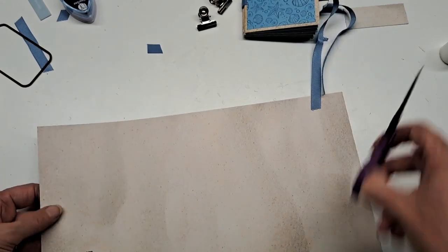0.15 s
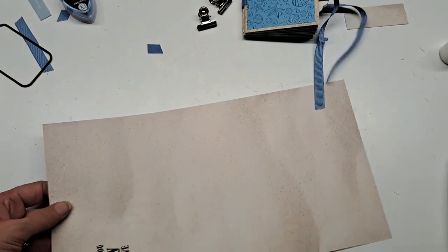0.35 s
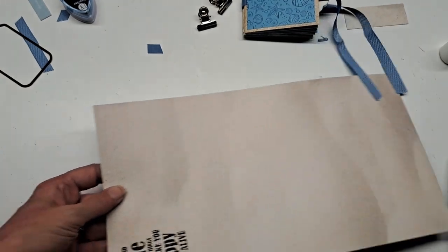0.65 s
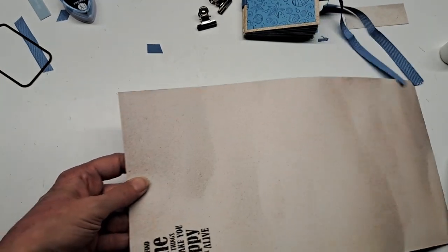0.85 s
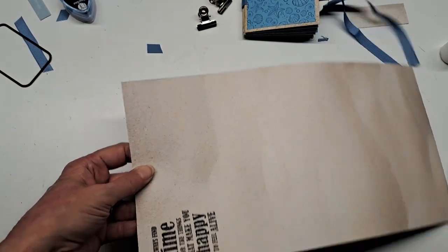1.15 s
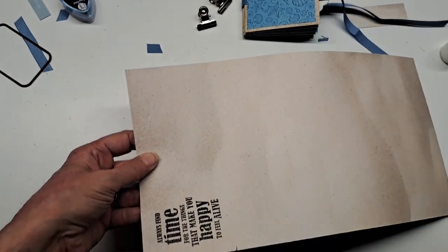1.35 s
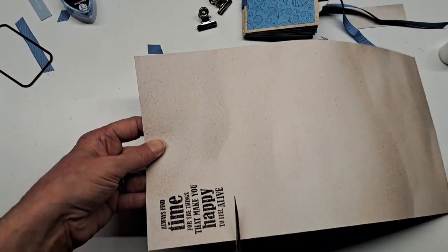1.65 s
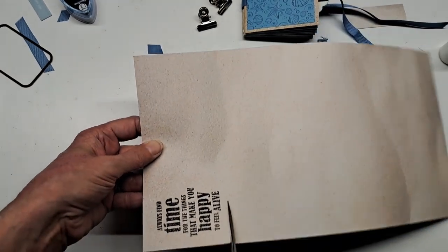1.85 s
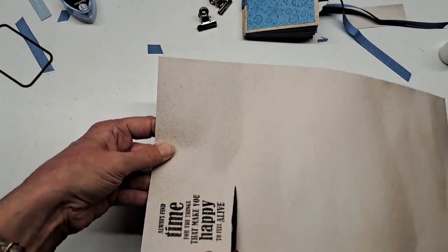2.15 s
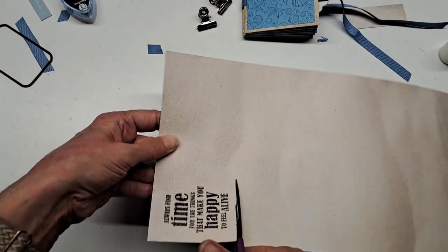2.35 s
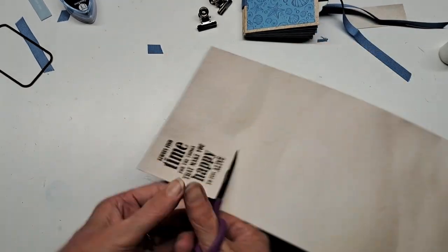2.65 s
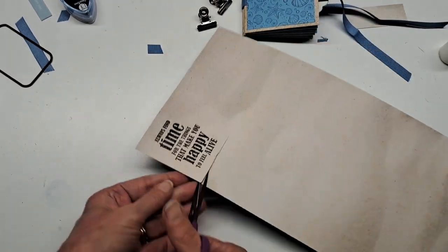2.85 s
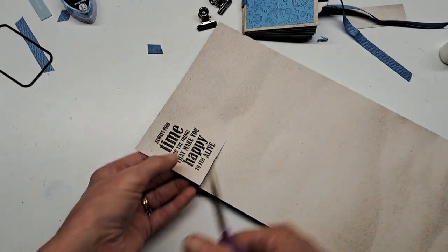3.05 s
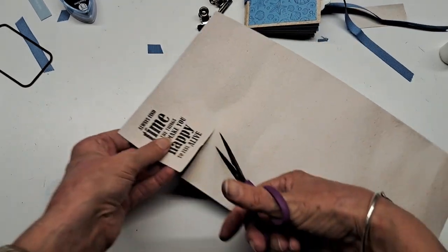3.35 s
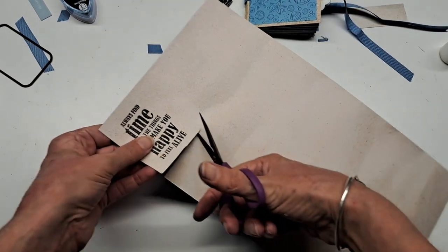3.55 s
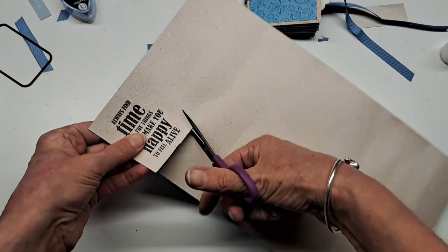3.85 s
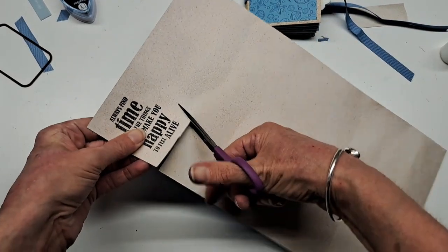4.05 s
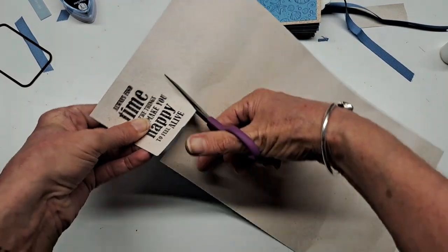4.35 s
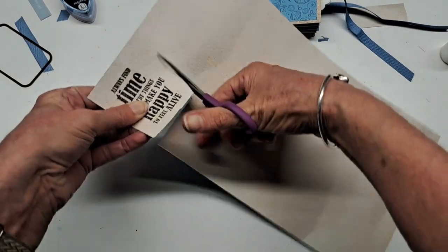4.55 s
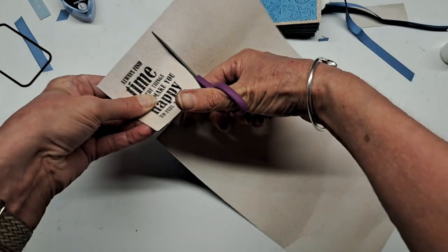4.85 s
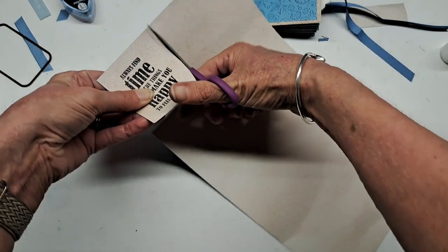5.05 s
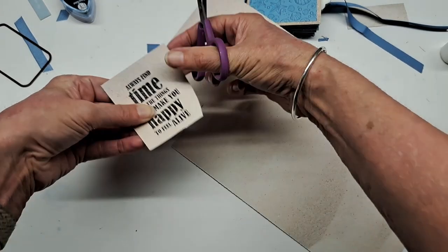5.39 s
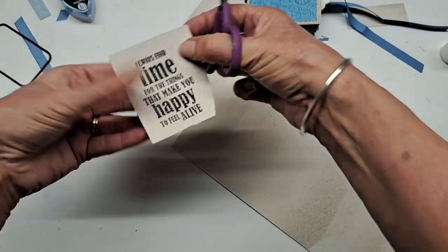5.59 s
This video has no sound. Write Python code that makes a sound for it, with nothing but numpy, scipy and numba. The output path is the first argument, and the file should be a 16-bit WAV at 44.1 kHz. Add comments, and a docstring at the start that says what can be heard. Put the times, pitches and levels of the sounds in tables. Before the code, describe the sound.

A close, dry stereo perspective in a small quiet room with faint air noise. At 0 s scissors scrape very briefly off the table; around 0.3-0.6 s a hand brushes softly along stiff card, its airy note falling. Faint nibbles and ticks at the edge come at 0.9-1.4 s. From about 1.7 s the cut builds, strongest from 2.0 to 2.45 s: coarse, uneven crunches with sharp fibre snaps and blade hiss. At 2.5-2.8 s the sheet is turned, with a cluster of dull bumps on the table and flexing, rubbing card. Quiet sliding and small ticks follow until 3.9 s, when soft low bumps lead into the second cut. From 4.0 to 5.2 s irregular crunching squeezes ring the card, growing brighter as the remaining strip narrows. Metallic clacks at 5.2-5.3 s, the middle one strongest, finish the cut, leaving near silence and a tiny tick around 5.56 s.

```python
"""First the scissors scrape briefly as they are picked up off the table, and a hand brushes along a sheet of
thick card with a falling note. The scissors then cut off a corner, close to the microphone in a small room:
each squeeze breaks fibres in quick uneven slips that ring the card, brighter as less card holds the piece, while
the blades hiss. Between the two cuts the sheet is turned and bumps the table; near the end the blades clack shut.
Slips, grains and noise bursts are the excitations; smooth spectra with resonances stand for the bodies."""
import sys
import numpy as np
from scipy import signal
from scipy.fft import rfft, irfft
from scipy.io import wavfile
from scipy.ndimage import uniform_filter1d
from numba import njit

SR = 44100
rng = np.random.default_rng(int(sys.argv[2]) if len(sys.argv) > 2 else 0)


def waveform_to_disk(signal):
    """Save audio, clipped to [-1, 1], as 16-bit WAV at the path in sys.argv[1]."""
    frames = np.transpose(np.atleast_2d(signal))
    scaled = np.clip(frames, -1, 1) * 32767
    samples = np.round(scaled).astype(np.int16)
    wavfile.write(sys.argv[1], SR, samples)


N = 252252
TIME = np.arange(N) / SR

# All levels are those of the sources, ahead of the room and the recorder.
# The blades bite or scrape the card; the first row is the scissors scraping off the table:
# start_s, attack_s, length_s, swell_db (over that length), crunch_db,
# bite_db (edge against crunch), hiss_db (blades), strip_hz (note of the strip)
SQUEEZES = [ (0.0, 0.00051, 0.024, -8, -60, 9, -74, 5700), (0.92, 0.0073, 0.13, 0, -46, -6.5, -56.5, 1050),
            (1.104, 0.015, 0.049, 13, -57, -7.5, -67.5, 1130),
            (1.164, 0.016, 0.12, -13, -58, -17, -63, 2220),
            (1.299, 0.031, 0.25, -1, -72.5, -6.5, -106, 3950),
            (1.622, 0.01, 0.075, 6.5, -58.5, -4, -69.5, 1180),
            (1.747, 0.006, 0.071, 26, -55, -5.5, -66.5, 1140),
            (1.795, 0.049, 0.081, -5.5, -37, -10, -50, 1350),
            (1.921, 0.024, 0.09, 13, -47.5, -7.5, -54.5, 1820),
            (2.031, 0.019, 0.059, 0, -32.5, -16.5, -49.5, 1820),
            (2.154, 0.016, 0.062, 5.5, -38.5, -14, -50.5, 945),
            (2.203, 0.0093, 0.031, 7, -35, -22, -48.5, 1030),
            (2.258, 0.015, 0.026, 3, -38.5, -27, -52.5, 416), (2.293, 0.01, 0.036, -1, -35, -6, -44, 2210),
            (2.355, 0.014, 0.028, 3, -46.5, -26, -55, 980), (2.399, 0.003, 0.053, -2, -38, -19, -49, 1160),
            (3.321, 0.0035, 0.054, -8, -50.5, -8.5, -68, 2135),
            (3.379, 0.019, 0.16, -6, -59, -2, -72, 3320), (3.977, 0.015, 0.066, 10.5, -47, -9, -62, 716),
            (4.134, 0.019, 0.061, 1.5, -45, -3, -51.5, 1440), (4.225, 0.014, 0.061, 0, -38, -3, -48.5, 666),
            (4.3, 0.008, 0.044, 13, -57.5, -3, -53.5, 2030),
            (4.361, 0.013, 0.092, -3.5, -45.5, -4.5, -49.5, 680),
            (4.47, 0.017, 0.047, -4, -36.5, -1.5, -46, 1800),
            (4.556, 0.0023, 0.042, -9, -49.5, -6.5, -52, 2550),
            (4.61, 0.0076, 0.1, 8, -43.5, -4, -49, 1910), (4.692, 0.0084, 0.03, 4.5, -36.5, -9.5, -50, 290),
            (4.72, 0.011, 0.035, 0.5, -30.5, -7, -44, 1660),
            (4.811, 0.017, 0.063, 8, -49.5, -21, -66, 1500),
            (4.849, 0.018, 0.11, -0.5, -41, -5, -48.5, 2460), (4.968, 0.013, 0.037, 10, -38, 3, -44, 1720),
            (5.046, 0.015, 0.01, 2.5, -33.5, -4.5, -51.5, 2470),
            (5.062, 0.008, 0.038, 2.5, -42.5, -26, -57, 1650),
            (5.114, 0.01, 0.022, -2.5, -36.5, -2, -48, 2800), (5.161, 0.022, 0.05, 7, -37, -21, -54, 1360),
            (5.204, 0.04, 0.053, 4.5, -39.5, 6, -37.5, 2800),
            (5.3, 0.023, 0.045, 14.5, -60, 4, -54.5, 2050)]
# Hands and sheet slide; the first row belongs to the scissors leaving the table:
# start_s, length_s, swell_db (over that length), flex_db, rub_db, swish_db
SLIDES = [ (0.0, 0.021, -35, -36, -73, -44.5), (0.014, 0.056, 8.5, -60.5, -62, -68),
          (0.28, 0.21, 6, -107, -99, -70.5), (0.489, 0.069, 2.5, -101, -105, -62.5),
          (0.598, 0.21, 1, -81, -80, -72), (0.766, 0.24, 15, -100, -69, -75),
          (2.446, 0.078, -1, -57, -49, -45.5), (2.55, 0.064, -11, -32.5, -37, -44.5),
          (2.662, 0.054, 6, -55.5, -55, -53), (2.734, 0.098, 3, -48, -54, -63.5),
          (2.882, 0.11, 3.5, -54.5, -57, -67), (3.038, 0.18, -4.5, -71, -69, -70),
          (3.212, 0.1, 21, -70, -65.5, -76.5), (3.312, 0.21, 3, -72, -63.5, -56),
          (3.52, 0.091, -14, -58.5, -50, -64.5), (3.754, 0.086, -5, -84, -61.5, -72),
          (3.831, 0.11, 6.5, -59, -52.5, -58.5), (3.944, 0.093, 4.5, -47.5, -54, -55),
          (5.562, 0.0098, -12.5, -58.5, -64, -61.5)]
# The gap under the sheet resonates lower as the hand moves: time_s, pitch_hz, level_db
HAND_GAP = [(0.12, 2000, -94), (0.3, 2000, -83.5), (0.43, 1970, -79), (0.53, 1700, -70), (0.585, 1310, -70),
            (0.62, 1150, -100)]
# The card snaps or ticks against a blade: start_s, level_db, treble_db (against the middle), pitch_hz
SNAPS = [(0.925, -57, -7, 970), (1.157, -45, -22, 2160), (1.724, -47.5, -22, 1160), (1.836, -33, -26, 1350),
         (1.939, -37, -24, 850), (2.052, -30, -23, 1510), (2.061, -29, -24, 2070), (2.097, -26, -25, 940),
         (2.164, -35, -24, 1010), (2.226, -29, -31, 950), (2.234, -27, -21, 1340), (2.302, -31, -20, 2270),
         (2.321, -25.5, -30, 2270), (2.34, -30, -36, 1005), (2.404, -29, -35, 2220),
         (2.426, -31, -27, 2270), (2.452, -32.5, -26, 960), (2.94, -40, -31, 1700),
         (3.215, -53.5, -7, 1710), (3.321, -37, -15, 1480), (4.128, -44, -16, 1150),
         (4.147, -38, -30, 1120), (4.198, -31.5, -17, 990), (4.232, -33, -35, 1030),
         (4.468, -36.5, -28, 1280), (4.5578, -29.5, -17, 2500), (4.6046, -40, -20, 950),
         (4.708, -30, -24, 1010), (5.245, -30.5, -20.5, 2790), (5.562, -51.5, -6, 2600)]
# Sheet and scissors bump the table: start_s, level_db, centre_hz (of the blow), chatter_t60_s
BUMPS = [(2.489, -25, 1060, 0.012), (2.563, -19, 1100, 0.059), (2.573, -31.5, 350, 0.06),
         (2.593, -23.5, 720, 0.035), (2.61, -26, 754, 0.027), (2.622, -29.5, 450, 0.077),
         (2.633, -29.5, 610, 0.023), (2.756, -30, 870, 0.05), (2.778, -33, 980, 0.03),
         (2.815, -34, 800, 0.087), (3.253, -52, 450, 0.6), (3.362, -42, 323, 0.1),
         (3.945, -31.5, 350, 0.16), (3.956, -34, 347, 0.03), (3.969, -31.5, 546, 0.17),
         (4.024, -32.5, 576, 0.04)]
# Steel meets steel: start_s, level_db, scrape_t60_s, steel_db (against card), card_pitch_hz
CLACKS = [(5.191, -22, 0.039, -13, 5000), (5.252, -16, 0.034, 20, 3350), (5.2929, -22.5, 0.17, 10, 2080)]

# Colour of the crunch at the first nibble of the edge, in the whole sheet, in the second cut
# and in the last narrow neck: frequency_hz, level_db
EDGE_SPECTRUM = [(60, -40), (200, -21.5), (430, 0), (570, -3.5), (800, 1), (980, 11), (1400, 2),
                 (2200, -4.5), (2900, -15.5), (3850, -5.5), (4800, -27), (7800, -10), (10000, -99)]
SHEET_SPECTRUM = [(35, -68), (60, -15.5), (167, -25), (411, -11), (500, -10.5), (780, -10.5), (971, -4.5),
                  (1200, -11.5), (2250, -14.5), (2760, -14.5), (3670, -10.5), (5000, -26.5), (8000, -17.5),
                  (10400, -69), (17600, -120)]
CORNER_SPECTRUM = [(35, -31.5), (60, -12), (167, -20.5), (213, -6.5), (251, -17), (290, -9.5), (559, -6.5),
                   (991, -1), (1590, -5.5), (1690, -6.5), (8000, -29.5), (10400, -72.5), (17600, -120)]
NECK_SPECTRUM = [(65, -24.5), (110, -12.5), (247, -10.5), (353, -9), (820, -8), (1710, -0.5), (3380, -6),
                 (3970, -9.5), (4670, -12), (8000, -21), (10400, -57), (17600, -120)]
# When each of these four colours holds alone: time_s
STAGE_S = [1.598, 1.95, 4.398, 4.949]

# Resonances of the card, of the sheet lying on the table, and of the blades: centre_hz, width_hz, lift_db
CARD_MODES = [(420, 38, 5.5), (2278, 86, 4), (3310, 57, 4), (4610, 540, 9)]
TABLE_MODES = [(115.8, 15, 13.5), (426, 35, 12.5), (809, 8.2, 9), (941, 30, 8.5), (1021, 42, 9),
               (1414, 30, 7.5), (2203, 62, 2)]
STEEL_MODES = [(2000, 60, 7), (2700, 200, 6), (3400, 120, 8), (7500, 150, 5), (10050, 25, 12),
               (10960, 160, 6), (12680, 120, 5)]

# Spectra of the blades' hiss, the flexing sheet, the rub on the table, the swish of skin, the blow
# on the table, the clack of steel and the quiet air of the room: frequency_hz, level_db
HISS_SPECTRUM = [(3000, -4), (5500, 5), (7500, 3.5), (9200, -3.5), (11000, -1), (13500, -1.5), (16000, -12)]
FLEX_SPECTRUM = [(22, 1.5), (45, -1.5), (75, -6), (110, -6.5), (170, -15.5), (240, -1.5), (430, -7),
                 (700, 0), (1500, -54.5)]
RUB_SPECTRUM = [(300, -12), (600, 13), (1000, 15), (2000, 17.5), (3500, 1), (6000, -44.5)]
SWISH_SPECTRUM = [(1500, -23.5), (3200, -3), (3950, 2), (4400, 2), (5700, 2.5), (9000, -1), (13000, -4),
                  (16000, -7.5)]
BLOW_SPECTRUM = [(25, -16), (50, -5), (110, 5), (230, 1), (400, 4), (550, -3), (750, 4), (1020, 4.5),
                 (1200, -4), (2000, -1), (4000, -3), (15000, -38.5)]
CLACK_SPECTRUM = [(60, -15.5), (400, 7), (580, -9.5), (1000, 1), (3000, -1), (5200, -2.5), (7000, -3.5),
                  (9000, -4.5), (11000, -2), (16000, -10.5)]
AIR_SPECTRUM = [(25, -10), (70, -4), (200, -6.5), (400, -7), (1000, -20), (4000, -21), (16000, -21)]
# Left against right channel: frequency_hz, difference_db
STEREO_LEAN = [(100, 0), (350, -0.5), (700, -2), (2000, -2), (4400, -4), (7500, -2), (10500, 1),
               (15000, 0.5)]

AIR_DB = -76
SLIDE_ATTACK_S, SLIDE_RELEASE_DB_PER_S = 0.027, 259
CRUNCH_RELEASE_DB_PER_S, HISS_RELEASE_DB_PER_S = 528.5, 380.5
SLIP_HZ, SLIP_JITTER = 215, .3  # median rate; spread of the log intervals
STRIP_DB, STRIP_Q = 5, 18.5  # ring of the strip of card beside the blades
STRIP_WANDER, STRIP_HOP_S = .09, .011  # its note shifts by about this share at every hop
CRUNCH_BITE_SPLIT_HZ = 2500
SNAP_Q, SNAP_LIFT_DB = 2.9, 14
LEFT_LEAD_S = 70e-6
BASS_WIDTH = .17  # share of the side signal that reaches down into the bass
TOP_HZ = 15400


def undb(db):
    """Level law: decibels to an amplitude ratio."""
    return 10 ** (np.asarray(db) / 20)


def unit(x):
    """Normalisation: scale to an rms of 1."""
    return x / np.sqrt(np.mean(x ** 2))


def running_rms(x, seconds):
    """Short-time level: rms over a moving window."""
    power = uniform_filter1d(x ** 2, max(int(seconds * SR), 1))
    return np.sqrt(np.abs(power) + 1e-18)


def colour(x, points, modes=(), size=8192):
    """Minimum-phase filtering: a smooth spectrum with resonances standing on it, realised causally."""
    hz = np.maximum(np.arange(size // 2 + 1) * SR / size, 1)
    points = np.array(points, float)
    db = np.interp(np.log(hz), np.log(points[:, 0]), points[:, 1])
    for centre, width, lift in modes:
        detuning = 2 * (hz - centre) / width
        db = db + 10 * np.log10(1 + (undb(abs(lift)) ** 2 - 1) / (1 + detuning ** 2))
    # folding the cepstrum forward in time makes the response causal
    cepstrum = irfft(np.log(undb(db)))
    cepstrum[1:size // 2] *= 2
    cepstrum[size // 2 + 1:] = 0
    response = irfft(np.exp(rfft(cepstrum)))
    return np.apply_along_axis(lambda row: signal.oaconvolve(row, response)[:len(row)], -1, x)


@njit
def resonate(x, hz, q):
    """Resonance with a moving centre: a state-variable band-pass on mid and side."""
    y = np.empty_like(x)
    for c in range(len(x)):
        band, low = 0., 0.
        for i in range(len(hz)):
            g = np.tan(np.pi * hz[i] / SR)
            v = (band + g * (x[c, i] - low)) / (1 + g * (g + 1 / q))
            band, low, y[c, i] = 2 * v - band, low + 2 * g * v, v / q
    return y


def spread(x):
    """Incoherent radiation: mid and side, where every tiny contact radiates to its own side."""
    return np.array([x, x * rng.choice([-1, 1], len(x))])


def burst(t60, size=22050):
    """Exponential decay: dying noise of energy 1."""
    decay = np.exp(-np.log(1000) * np.arange(size) / SR / max(t60, 1 / 1000))
    x = rng.standard_normal(size) * decay
    return x / np.linalg.norm(x)


def blow(crack_t60, chatter_t60, chatter_db):
    """Impact excitation: a short crack and the small contacts that follow it."""
    return spread(burst(crack_t60) + undb(chatter_db) * burst(chatter_t60))


def add(out, start_s, sound, level_db):
    """Superposition: put a hit into the track, its loudest 3 ms in the middle at the given level."""
    start = int(start_s * SR)
    sound = sound / running_rms(np.pad(sound[0], 200), .003).max()
    out[:, start:start + sound.shape[1]] += undb(level_db) * sound[:, :N - start]


def grains(rate, spread_db):
    """Random micro-impacts: tiny clicks of unequal size at random times."""
    present = rng.random(N) < rate / SR
    polarity = rng.choice([-1, 1], N)
    size = undb(spread_db * np.clip(rng.standard_normal(N), -2, 2))
    return unit(present * polarity * size)


def stroke(start_s, length_s, swell_db, attack_s, release_db_per_s):
    """Hand pressure as an envelope: it builds, swells or eases while it is held, then lets go."""
    t = np.maximum(TIME - start_s, 0)
    held_db = swell_db * (np.minimum(t / length_s, 1) - .5)
    release_db = release_db_per_s * np.clip(t - length_s, 0, 1)
    return np.minimum(t / attack_s, 1) * undb(held_db - release_db)


def ringing(hz):
    """Local resonance: the card's modes plus the note of the spot that snapped."""
    return CARD_MODES + [(hz, hz / SNAP_Q, SNAP_LIFT_DB)]


def room_air():
    """Background noise: the faint steady air of the room as coloured random noise."""
    return undb(AIR_DB) * unit(colour(spread(rng.standard_normal(N)), AIR_SPECTRUM))


def room(x, side_db, side_hz, tail_db, t60):
    """Diffuse field: treble spreads wide, long waves reach both sides alike; a tail follows middle and treble."""
    mid, side = x
    radiated = signal.lfilter(*signal.butter(2, 600, "highpass", fs=SR), mid)
    tail_mid, tail_side = (undb(tail_db) * signal.fftconvolve(radiated, burst(t60))[:N] for _ in range(2))
    wide = undb(side_db) * side + tail_side
    wide = signal.lfilter(*signal.butter(2, side_hz, "highpass", fs=SR), wide)
    side = BASS_WIDTH * side + wide
    left, right = (
        colour(mid + tail_mid + sign * side, [(hz, sign * db / 2) for hz, db in STEREO_LEAN])
        for sign in (1, -1))
    late_right = np.pad(right, (int(LEFT_LEAD_S * SR), 0))[:N]
    return np.array([left, late_right])


def sweep():
    """Cavity resonance: a hand brushes along the sheet and the gap under it gives the swish a falling note."""
    s, hz, db = np.transpose(HAND_GAP)
    note = resonate(spread(rng.standard_normal(N)), np.interp(TIME, s, hz), 6.6)
    level = undb(np.interp(TIME, s, db, left=-np.inf, right=-np.inf))
    return unit(note) * level


def sliding():
    """Sliding friction: after the scissors leave the table, the sheet flexes and drags and skin brushes it."""
    flex = unit(colour(spread(grains(rate=1400, spread_db=11.5)), FLEX_SPECTRUM, TABLE_MODES[:2]))
    rub = unit(colour(spread(grains(rate=830, spread_db=0.5)), RUB_SPECTRUM, TABLE_MODES))
    swish = unit(colour(spread(grains(rate=9000, spread_db=2)), SWISH_SPECTRUM))
    out = np.zeros((2, N))
    for start_s, length_s, swell_db, flex_db, rub_db, swish_db in SLIDES:
        speed = stroke(start_s, length_s, swell_db, SLIDE_ATTACK_S, SLIDE_RELEASE_DB_PER_S)
        out += speed * (undb(flex_db) * flex + undb(rub_db) * rub + undb(swish_db) * swish)
    return out


def bumps():
    """Impact on a plate: dull blows ring sheet and table; a softer contact favours the lower resonances."""
    out = np.zeros((2, N))
    for start_s, level_db, centre_hz, chatter_t60_s in BUMPS:
        band = [centre_hz / 1.13, min(centre_hz * 1.22, SR / 3)]
        contact = signal.butter(1, band, "bandpass", fs=SR)
        push = blow(crack_t60=.002, chatter_t60=chatter_t60_s, chatter_db=1)
        hit = colour(signal.lfilter(*contact, push), BLOW_SPECTRUM, TABLE_MODES)
        add(out, start_s, hit, level_db)
    return out


def snaps():
    """Sudden release: single sharp snaps and ticks of the card, each with its own short note."""
    out = np.zeros((2, N))
    for start_s, level_db, treble_db, pitch_hz in SNAPS:
        push = blow(crack_t60=.008, chatter_t60=.05, chatter_db=-4)
        middle = unit(colour(push, CORNER_SPECTRUM, ringing(pitch_hz)))
        treble = unit(colour(push, HISS_SPECTRUM))
        add(out, start_s, middle + undb(treble_db) * treble, level_db)
    return out


def clacks():
    """Impact of steel on steel: the blades break through the last of the card and strike each other."""
    out = np.zeros((2, N))
    for start_s, level_db, scrape_t60_s, steel_db, pitch_hz in CLACKS:
        push = blow(crack_t60=.005, chatter_t60=scrape_t60_s, chatter_db=-1)
        card = unit(colour(push, NECK_SPECTRUM, ringing(pitch_hz)))
        steel = unit(colour(push, CLACK_SPECTRUM, STEEL_MODES))
        add(out, start_s, card + undb(steel_db) * steel, level_db)
    return out


def slips(rate, jitter, spread_db, count=4000):
    """Stick and slip: the edge loads the card and jumps on at uneven intervals."""
    chance = rng.standard_normal((count, 2))
    at = (np.cumsum(np.exp(jitter * chance[:, 0])) * SR / rate).astype(int)
    inside = at < N
    x = np.zeros(N)
    x[at[inside]] = undb(spread_db * np.clip(chance[inside, 1], -2, 2))
    return unit(x)


def travel(x, path_s, t60):
    """Bending waves return from the card's edges; their paths change as the cut moves on."""
    hop = int(path_s * SR)
    window = signal.windows.hann(2 * hop, sym=False)
    out = np.zeros((2, 2 * N))
    for start in range(0, N - 2 * hop, hop):
        echoes = signal.fftconvolve(x[:, start:start + 2 * hop] * window, burst(t60, size=1024)[None])
        out[:, start:start + echoes.shape[1]] += echoes
    return out[:, :N]


def wander(hop_s):
    """Random modulation: values each held for a moment."""
    return rng.standard_normal(N)[(TIME / hop_s).astype(int)]


def squeezing():
    """Pressure as control: the strongest squeeze leads, and the blades slide on after fibres stop breaking."""
    gains = np.zeros((3, N))  # crunch, bite, hiss
    note = np.full(N, 1000.)  # strip note in Hz until the first row sets it
    for start_s, attack_s, length_s, swell_db, crunch_db, bite_db, hiss_db, strip_hz in SQUEEZES:
        pressure = undb(crunch_db) * stroke(start_s, length_s, swell_db, attack_s, CRUNCH_RELEASE_DB_PER_S)
        glide = undb(hiss_db) * stroke(start_s, length_s, swell_db, attack_s, HISS_RELEASE_DB_PER_S)
        note = np.where(pressure > gains[0], strip_hz, note)
        gains = np.maximum(gains, [pressure, undb(bite_db) * pressure, glide])
    return gains, note


def card_ring(force, note):
    """Forced vibration: the force rings the card, whose colour changes by stages, and the strip by the blades."""
    shapes = (EDGE_SPECTRUM, SHEET_SPECTRUM, CORNER_SPECTRUM, NECK_SPECTRUM)
    shares = [np.interp(TIME, STAGE_S, stage) for stage in np.eye(len(STAGE_S))]
    ring = sum(share * unit(colour(force, shape, CARD_MODES)) for share, shape in zip(shares, shapes))
    strip_hz = note * np.exp(STRIP_WANDER * wander(STRIP_HOP_S))
    return ring + undb(STRIP_DB) * resonate(ring, strip_hz, float(STRIP_Q))


def cutting():
    """Stick-slip fracture: slips and breaking fibres ring the card, and the edges hiss in the same rhythm."""
    (crunch_gain, bite_gain, hiss_gain), note = squeezing()
    jumps = slips(rate=SLIP_HZ, jitter=SLIP_JITTER, spread_db=1.5)
    # every jump tears a short shower of single fibres, dying with a 4 ms time constant
    shower = unit(signal.lfilter([1], [1, -np.exp(-1 / (SR * .004))], jumps))
    fibres = unit(shower * grains(rate=7700, spread_db=4))
    friction = rng.standard_normal(N)

    depth = np.interp(TIME, STAGE_S[:2], [.35, 1])  # at the rim the blades mostly scrape
    force = spread(depth * (undb(-6) * jumps + fibres) + undb(-5) * friction)
    force = force + undb(-2) * travel(force, path_s=.06, t60=.016)
    ring = card_ring(force, note)

    card = 0
    for kind, gain in (("lowpass", crunch_gain), ("highpass", bite_gain)):
        part = signal.lfilter(*signal.butter(4, CRUNCH_BITE_SPLIT_HZ, kind, fs=SR), ring)
        card = card + gain * part / running_rms(part[0], .027)  # the hand keeps its pressure
    edges = spread(undb(-24.5) * jumps + undb(-6) * fibres + friction)
    return card + hiss_gain * unit(colour(edges, HISS_SPECTRUM))


def scene():
    """Superposition of all the work at the table over the faint air, heard in the room."""
    work = sweep() + sliding() + bumps() + snaps() + clacks() + cutting()
    return room(work + room_air(), side_db=-4.5, side_hz=746, tail_db=-7.0, t60=0.082)


def record(dry):
    """Band limitation: the recorder cuts the deepest rumble and the top."""
    dry = signal.sosfilt(signal.butter(4, 33, "highpass", fs=SR, output="sos"), dry)
    return signal.sosfilt(signal.ellip(8, .2, 80, TOP_HZ, fs=SR, output="sos"), dry)


dry = scene()
out = record(dry)
waveform_to_disk(out)
```